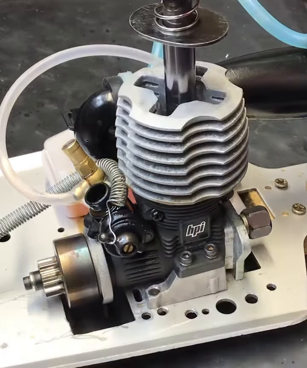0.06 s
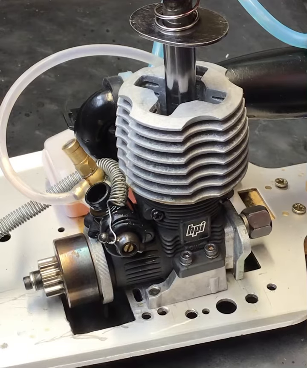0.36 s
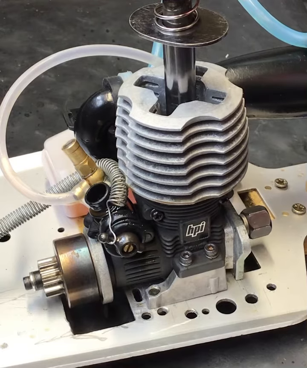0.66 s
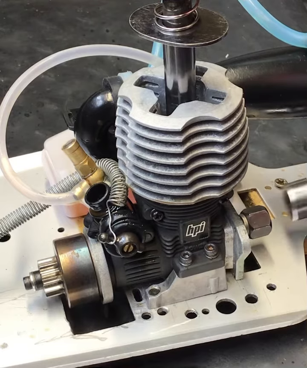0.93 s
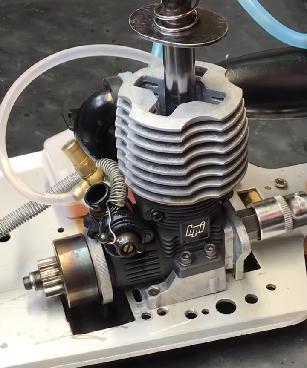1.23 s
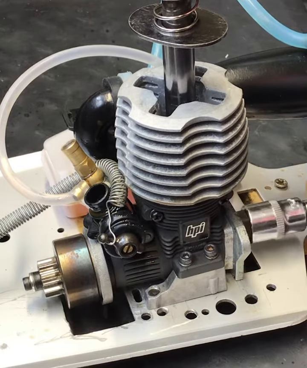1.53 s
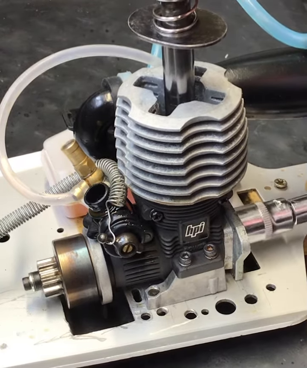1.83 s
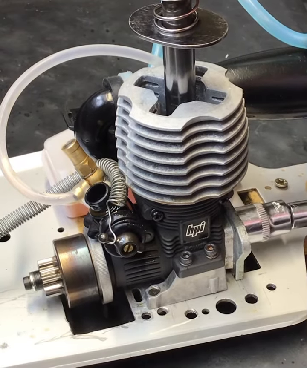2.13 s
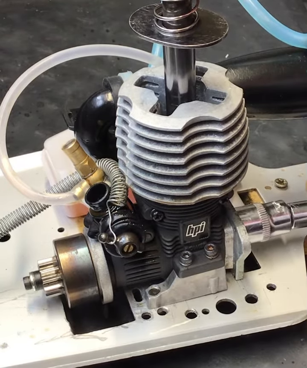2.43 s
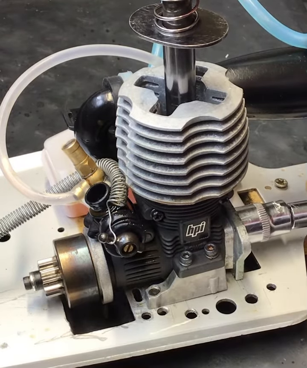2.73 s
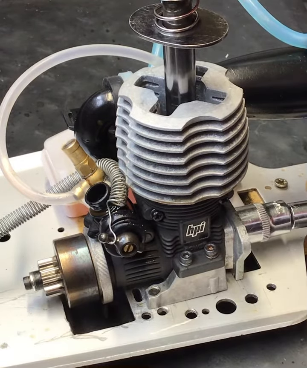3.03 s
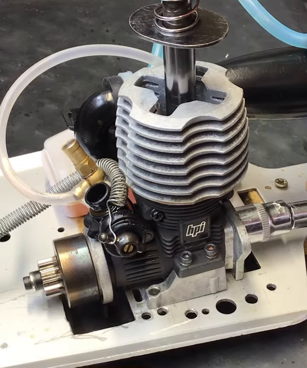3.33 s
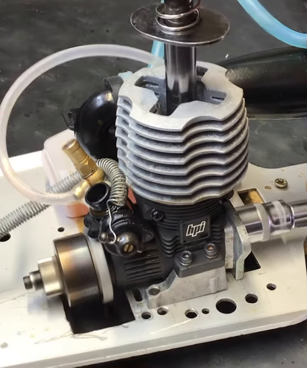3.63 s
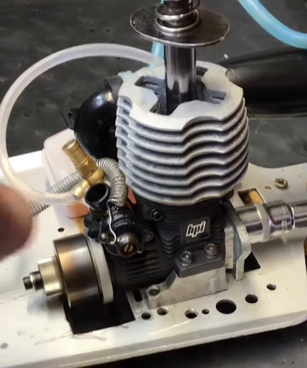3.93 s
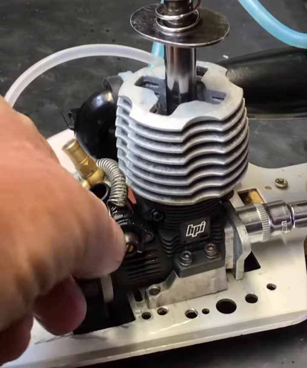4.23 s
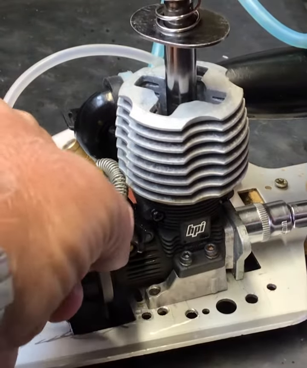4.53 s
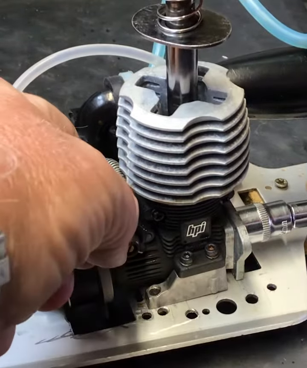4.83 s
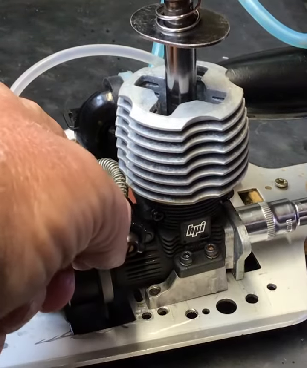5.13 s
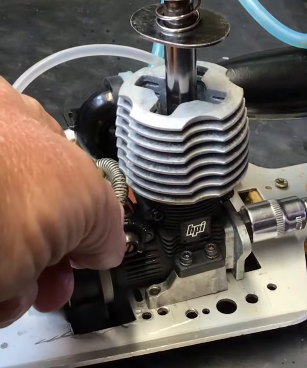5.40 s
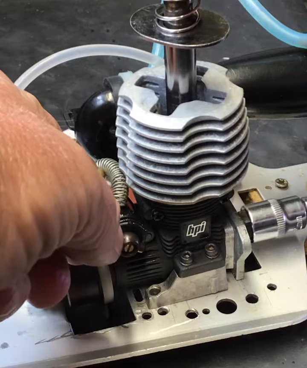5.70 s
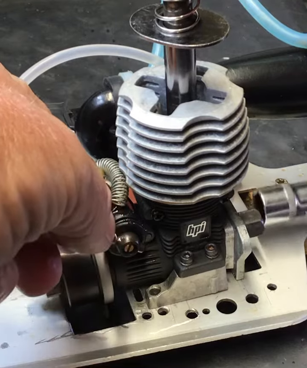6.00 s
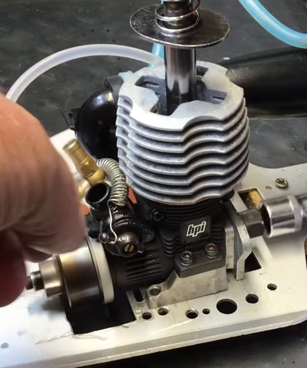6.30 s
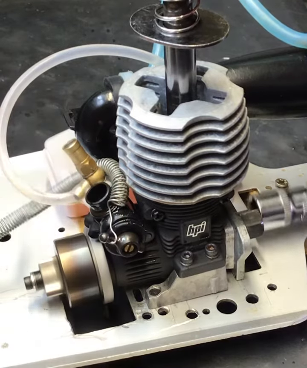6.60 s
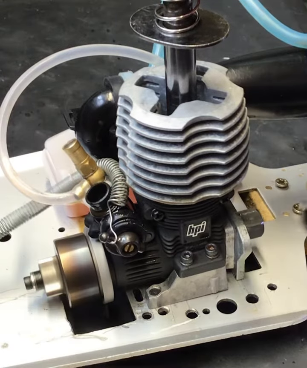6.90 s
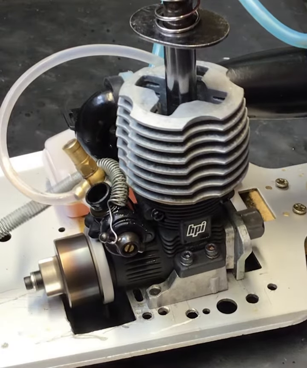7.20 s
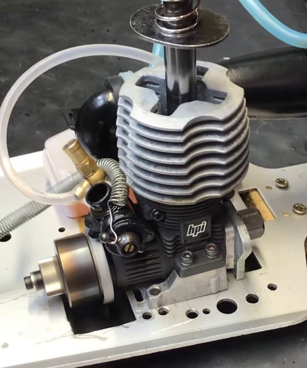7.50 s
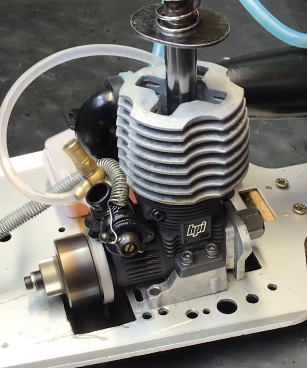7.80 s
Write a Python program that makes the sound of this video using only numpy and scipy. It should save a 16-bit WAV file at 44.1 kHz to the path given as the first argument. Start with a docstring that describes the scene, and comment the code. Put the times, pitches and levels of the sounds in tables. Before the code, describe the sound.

A metal socket clinks onto a nut, then a small model engine sputters, catches and idles with a fast, uneven, rattling buzz.

```python
"""A drill's socket scrapes and clinks onto a starter nut, and a metal chassis thuds on its bench.
The drill spins the crank; a small two-stroke glow engine sputters, catches and idles fast and unevenly.
Its exhaust port opens once a turn for a buzzing note, uneven firings pop in the pipe, and piston,
rod and gears rattle the casing. The drill is drawn off and the engine runs on alone.
All of it is heard close up, in mono, over a faint workshop rumble."""
import sys
import numpy as np
from scipy import signal
from scipy.fft import rfft, irfft
from scipy.io import wavfile
from scipy.ndimage import map_coordinates

SR = 44100
rng = np.random.default_rng(int(sys.argv[2]) if len(sys.argv) > 2 else 0)


def inscribe(sig):
    """Save sig as 16-bit PCM at rate SR to the path in sys.argv[1].

    A 1-D sig is mono; a 2-D sig holds one channel per row.
    Samples are clipped to [-1, 1] before scaling.
    """
    pcm = np.round(np.clip(np.atleast_2d(sig).T, -1, 1) * 32767)
    wavfile.write(sys.argv[1], SR, pcm.astype(np.int16))


N = 350595
TIME = np.arange(N) / SR

# Metal knocks, then two sharp cracks as the engine sputters and catches. Each row: start in seconds, strength
# in dB, weight in dB (lifts the hit's low clunk), hardness in dB.
HITS = [(0.2627, -35, 0, -13), (0.2824, -45, 7, -14), (0.2994, -57, 14, -10), (0.381, -55, 17, -15),
        (0.419, -60, 4, -11), (0.456, -60, 6, -16), (1.032, -65, 10, 7), (1.067, -68, 1, 8),
        (1.101, -45, 6, 4), (1.133, -63, 12, 0), (1.358, -54, 3, 8), (1.464, -65, 0, 14),
        (1.4764, -62, 24, 9), (1.491, -56, 18, -1), (1.5536, -58, 11, -4), (1.642, -30.5, -4.5, 13),
        (1.664, -52, 17, 9), (1.698, -57, 14, 0), (1.748, -59, 12, 1), (1.925, -48.5, -4, -3),
        (3.31, -45, 1, -5), (3.3699, -29, 0, 2), (3.416, -19, 3, 15), (3.643, -31, 0, 6), (3.75, -31, 2, 6)]


def from_db(db):
    """Decibels to gain."""
    return 10 ** (np.asarray(db) / 20)


def rms_one(x):
    """Scale to unit rms."""
    return x / np.sqrt(np.mean(x ** 2) + 1e-20)


def in_time(curve):
    """Read a curve of (seconds, value) rows at every sample."""
    return np.interp(TIME, *np.transpose(curve))


def at_hz(spectrum, hz):
    """Read a spectrum of (Hz, dB) rows on a log-frequency axis."""
    points_hz, points_db = np.transpose(spectrum)
    return np.interp(np.log(hz), np.log(points_hz), points_db)


def drift(rate_hz):
    """Smooth random wander of unit rms."""
    knots = rng.standard_normal(int(TIME[-1] * rate_hz) + 2)
    fine = signal.resample_poly(knots, 10, 1)
    return rms_one(np.interp(TIME * rate_hz * 10, np.arange(len(fine)), fine))


def per_turn(turns):
    """One random value for each turn of the crank, gliding to the next."""
    count = int(turns[-1]) + 2
    return np.interp(turns, np.arange(count), rng.standard_normal(count))


def band(x, low_hz, high_hz):
    """Butterworth band-pass."""
    sos = signal.butter(2, [low_hz, min(high_hz, .45 * SR)], "band", fs=SR, output="sos")
    return signal.sosfilt(sos, x + 1e-18)


def colour(x, spectrum, modes=(), size=8192):
    """An EQ of unit power gain: a broad spectrum with resonant peaks and dips on it."""
    hz = np.maximum(np.fft.rfftfreq(size, 1 / SR), 1)
    db = at_hz(spectrum, hz)
    for centre, width, lift in modes:
        db += lift / (1 + (2 * (hz - centre) / width) ** 2)
    cepstrum = irfft(np.log(from_db(db)))[:size // 2]
    response = irfft(np.exp(2 * rfft(cepstrum, size)))   # minimum phase: nothing sounds early
    return signal.oaconvolve(x, response / np.linalg.norm(response))[:N]


def sliding(rise_s=.012):
    """Envelope of the socket sliding on the nut: each slide starts quickly and dies away."""
    # Slides of the socket. Each row: start in seconds, level in dB, t60 in seconds.
    slides = [(0, -68, .9), (.27, -73, 1.2), (1.11, -56, .25), (1.2, -70, 1.5), (1.43, -60, .6),
              (1.615, -50, .55), (2.005, -60, .5), (2.03, -71, 8), (2.99, -75, .4)]
    envelope = np.zeros(N)
    for start, db, t60 in slides:
        age = np.maximum(TIME - start, 0)
        envelope += from_db(db - 60 * age / t60) * (1 - np.exp(-age / rise_s))
    return envelope


def rubbing(stick_slip_db=3):
    """Steel catches and slides on steel as the socket is worked into place; a faint whistle passes."""
    # A faint, narrow whistle swells and fades, like a breath drawn in.
    # In order: start and length in seconds, pitch and width in Hz, level in dB.
    faint_whistle = (2.05, .75, 1810, 110, -81.5)
    # Tone of the scrape. Each row: frequency in Hz, relative level in dB.
    scrape_spectrum = [(250, 4), (700, 6.5), (1200, -5.5), (1800, -6.5), (2600, -8), (4500, -20.5),
                       (9000, -23.5), (15000, -30)]
    start, length, hz, width, db = faint_whistle
    slips = rms_one(from_db(stick_slip_db * drift(76)) * rng.standard_normal(N))
    swell = np.sin(np.pi * np.clip((TIME - start) / length, 0, 1))
    whistle = rms_one(band(slips, hz - width / 2, hz + width / 2))
    return sliding() * colour(slips, scrape_spectrum) + from_db(db) * swell * whistle


def workshop(air_db=-75, rumble_db=-63, handling_db=1):
    """A low rumble, stronger while the socket slides, under steady, faint air noise."""
    # Workshop room tone. Each row: frequency in Hz, relative noise density in dB.
    room_spectrum = [(15, -58), (25, -27), (69, -0.5), (142, -22), (363, -21), (978, -46.5), (2300, -40.5),
                     (3260, -45.5), (3540, -42), (15000, -54.5)]
    tone = colour(rng.standard_normal(N), room_spectrum)
    rumble = (from_db(rumble_db) + from_db(handling_db) * sliding()) * rms_one(band(tone, 25, 160))
    return rumble + from_db(air_db) * rms_one(band(tone, 200, 16000))


def blows(levels_db, band_hz, crack_t60, tail_db, tail_t60, ring_db, rise_s=.0015, detune=.0092):
    """One register of the hits: a crack, a short room tail, and modes that shift from hit to hit."""
    # Ring of the steel. Each row: frequency in Hz, relative level in dB, t60 in seconds.
    steel_modes = [(293, -2.5, .2), (482, -13.5, .1), (567, 1, 0.099), (655, -1.5, 0.084), (767, -7, .09),
                   (1912, 3, 0.059), (2010, -9, 0.041), (2340, 7.5, 0.035), (2480, -2.5, .05),
                   (2635, 1, 0.073), (3370, -4, 0.038), (4740, -5, 0.066), (6660, -11.5, 0.085),
                   (8870, 1.5, 0.033), (10000, -8, 0.065)]
    low_hz, high_hz = band_hz
    out, t = np.zeros(N), TIME[:SR // 4]
    for (start, *_), db in zip(HITS, levels_db):
        decay = from_db(-60 * t / crack_t60) + from_db(tail_db - 60 * t / tail_t60)
        burst = decay * rng.standard_normal(len(t))
        hit = band(burst, low_hz, high_hz) * np.sqrt(SR / 2 / (high_hz - low_hz))
        for hz, mode_db, t60 in steel_modes:
            if low_hz < hz < high_hz:
                swing = rng.choice([-1, 1]) * np.sin(2 * np.pi * hz * (1 + detune * rng.normal()) * t)
                hit += from_db(ring_db + mode_db + rng.normal(0, 2.3) - 60 * t / t60) * swing
        at = round(start * SR)
        out[at:at + len(t)] += from_db(db) * hit * (1 - np.exp(-t / rise_s))
    return out


def knocks_and_cracks():
    """Metal knocks, then two cracks of the catching engine: hard hits are bright, heavy ones clunk."""
    _, db, weight_db, hard_db = np.transpose(HITS)
    clunk_db, clank_db = db - 1.5 + weight_db, db + 1 - .17 * hard_db
    clack_db, edge_db = db - 1, db + 1.5 + hard_db
    clunk = blows(clunk_db, (230, 775), crack_t60=.044, tail_db=-16, tail_t60=.31, ring_db=-.5)
    clank = blows(clank_db, (1600, 2400), crack_t60=.034, tail_db=-23, tail_t60=.23, ring_db=-6.5)
    clack = blows(clack_db, (2450, 5500), crack_t60=.027, tail_db=-19.5, tail_t60=.2, ring_db=-3)
    edge = blows(edge_db, (5800, 12000), crack_t60=.012, tail_db=-24.5, tail_t60=.16, ring_db=-11.5)
    return clunk + clank + clack + edge


def thuds(t60=.16, rise_s=.0073, rumble_share=.3):
    """The chassis rocks on the bench top: a low swing that swells and dies."""
    # Rocks of the chassis. Each row: start in seconds, relative level in dB, pitch in Hz.
    rocks = [(0.279, -31, 75.4), (0.388, -39, 91.5), (0.614, -34.5, 93), (0.649, -43, 105),
             (0.795, -47, 80), (1.124, -32, 104), (1.169, -36, 114), (1.378, -32.5, 80),
             (1.493, -27.5, 103), (1.534, -31, 105), (1.666, -21.5, 91.5), (1.699, -26.5, 95),
             (1.773, -33, 110), (1.933, -40.5, 89), (3.403, -15.5, 109), (3.445, -8, 107)]
    out, t = np.zeros(N), TIME[:SR // 2]
    for start, db, hz in rocks:
        rumble = rms_one(band(rng.standard_normal(len(t)), 40, 164))
        envelope = from_db(db + 2.5 - 60 * t / t60) * (1 - np.exp(-t / rise_s))
        at = round(start * SR)
        out[at:at + len(t)] += envelope * (np.sin(2 * np.pi * hz * t) + rumble_share * rumble)
    return out


def chatter(turns, repeat_share, throb=.16, uneven_db=1.32, ticks_per_s=350, tick_share=.39, slop=.014):
    """Piston, rod and gears: contacts that recur each turn, random grinding and loose ticks."""
    one_turn = rng.standard_normal(200)
    position = (turns + slop * per_turn(turns)) % 1 * len(one_turn)
    recurring = map_coordinates(one_turn, [position], order=3, mode="grid-wrap") * (turns > 0)
    ticks = rms_one((rng.random(N) < ticks_per_s / SR) * rng.standard_normal(N))
    stroke = (1 + throb * np.cos(2 * np.pi * turns)) * from_db(uneven_db * per_turn(turns))
    grinding = rng.standard_normal(N)
    return rms_one(stroke * (grinding + tick_share * ticks + repeat_share * recurring))


def rattle(turns, blend, rattle_db, hiss_db, split_hz=9700):
    """The chatter shakes the casing, with a hiss on top; its ring blends between two colours."""
    # Broad tone of the rattle. Each row: frequency in Hz, relative noise density in dB.
    casing_spectrum = [(500, -13), (1050, -3), (1400, -8), (2000, -7), (2700, -5), (3400, -1), (4200, -6.5),
                       (5100, -2), (5700, -9.5), (6500, -6.5), (7500, -11.5), (8900, -6.5), (10200, -17),
                       (15800, -16.5)]
    # The casing's early and free-running ring colours. Each row: centre in Hz, width in Hz, lift in dB.
    early_modes = [(1850, 220, 7.5), (2465, 160, 7.5), (2990, 120, 9), (3140, 110, -15), (3860, 120, 6),
                   (4450, 70, 4), (5030, 62, 1), (5310, 140, 3), (6140, 160, 9.5), (6760, 260, 9),
                   (8700, 700, 4), (11300, 440, 2.5), (12100, 400, 3), (14200, 300, 7), (15300, 250, 4)]
    free_modes = [(1100, 22.5, 3.9), (1888, 97, 7.5), (2389, 180, 2.5), (3000, 167, 6.1), (3750, 180, 3.28),
                  (4540, 290, 9), (6200, 311, 2.5), (6720, 180, 2.7), (8855, 660, 3), (9400, 130.5, 3),
                  (11200, 310, 7.1), (13000, 180, 3), (14600, 350, 4)]
    drive = chatter(turns, repeat_share=.37)
    early, free = colour(drive, casing_spectrum, early_modes), colour(drive, casing_spectrum, free_modes)
    casing = blend * early + (1 - blend) * free
    body = signal.sosfiltfilt(signal.butter(3, split_hz, fs=SR, output="sos"), casing)
    return from_db(rattle_db + 1.98) * body + from_db(hiss_db + 6.5) * (casing - body)


def bench_echoes(x, echo_db=-11, t60=.078, count=40):
    """Bench top, tools and walls return a spray of early reflections that ripples the spectrum."""
    delays_s = rng.uniform(.002, .05, count)
    response = np.zeros(SR // 16)
    response[(delays_s * SR).astype(int)] = rng.choice([-1, 1], count) * from_db(-60 * delays_s / t60)
    response *= from_db(echo_db) / np.linalg.norm(response)
    response[0] = 1   # the direct sound
    return signal.oaconvolve(x, response / np.linalg.norm(response))[:N]


def sputter(turns, speed, skip, gas_share=.97, puff_turns=.66):
    """Strong and weak firings, often alternating, pop into the pipe, each with a puff of turbulent gas."""
    # Tone of the exhaust pipe and silencer. Each row: frequency in Hz, relative level in dB.
    pipe_spectrum = [(30, -62), (55, -7.5), (90, -2.5), (140, 1.5), (220, 0), (290, 1), (370, 5), (450, -3),
                     (560, 5.5), (700, 5), (830, -12), (1000, -19), (1200, -9), (1450, -31)]
    # Silencer chambers, which pick up the half-speed beat. Each row: centre and width in Hz, lift in dB.
    chambers = [(88.5, 16, 5), (106, 19, -6), (290.5, 18, 5), (234, 47, -2)]
    firings = np.flatnonzero(np.diff(np.floor(turns)) > 0)
    alternation = (-1.) ** np.arange(len(firings)) * np.tanh(3 * drift(5)[firings])
    strength = .64 * rng.standard_normal(len(firings)) + .67 * skip[firings] * alternation
    pops = np.zeros(N)
    pops[firings] = strength * np.sqrt(SR / speed[firings])   # equal power at any speed
    puffs = rms_one(np.exp(-(turns % 1) / puff_turns) * rng.standard_normal(N))
    return colour(pops + gas_share * puffs, pipe_spectrum, chambers)


def harmonic_levels(speed, wander_db=1.5):
    """Exhaust levels in dB: boom and bark ride curves; the pipe favours or swallows the rest by speed."""
    # The fundamental's boom, the second harmonic's bark. Each row: time in seconds, relative level in dB.
    boom = [(3.45, -25), (3.55, -27), (3.59, -34), (3.69, -18), (4.13, -22), (4.16, -28), (4.3, -20),
            (4.35, -25), (4.75, -18), (4.92, -31), (5.1, -23), (5.3, -23), (5.33, -28), (5.44, -22),
            (6.03, -17), (6.39, -20), (7.41, -17), (7.45, -20), (7.66, -17), (7.75, -23), (7.95, -21)]
    bark = [(3.45, -25), (3.52, -19), (3.65, -21), (3.71, -28), (4.29, -33), (4.55, -23), (4.8, -27),
            (4.88, -22), (5.91, -24), (6.03, -29), (6.08, -23), (6.14, -30), (6.22, -24), (6.43, -26),
            (6.93, -24), (7.35, -31), (7.47, -26), (7.56, -32), (7.67, -28), (7.95, -26)]
    # Pipe resonances that harmonics 3 and 4 glide through. Each row: frequency in Hz, relative level in dB.
    pipe_response = [(370, -27), (420, -22.5), (492, -42), (520, -26.5), (545, -28), (565, -32),
                     (595, -31.5), (660, -28.5), (725, -29.5), (800, -35)]
    third, upper = [at_hz(pipe_response, k * speed) + wander_db * drift(9) for k in (3, 4)]
    return in_time(boom) + .6, in_time(bark) + 1.6, third, upper - 3


def exhaust_note(turns, speed, rough=.061, upper_rough=.35, jitter_turns=.004):
    """The port opens once a turn; uneven burning roughens the higher harmonics most."""
    # Upper exhaust harmonics. Each row: multiple of the crank speed, relative level in dB.
    overtones = [(4, 7.5), (5, -10.5), (6, -11.5), (7, -12.5)]
    boom_db, bark_db, third_db, upper_db = harmonic_levels(speed)
    angle = 2 * np.pi * (turns + jitter_turns * per_turn(turns))
    note = from_db(boom_db - .5) * np.cos(angle) * (1 + rough * per_turn(turns))
    note += from_db(bark_db - 2.5) * np.cos(2 * angle) * (1 + 2 * rough * per_turn(turns))
    for multiple, db in [(3, third_db)] + [(k, upper_db + lift) for k, lift in overtones]:
        note += from_db(db - 4.5) * np.cos(multiple * angle) * (1 + upper_rough * per_turn(turns))
    return -np.sqrt(2) * note   # the harmonics line up in a sharp trough


def singing(turns, speed, blend, capture_hz=28, flicker=.3, fade_in_s=(3.65, 3.85)):
    """Strong modes stand out of the rattle; a crank harmonic that meets one draws a tone from it."""
    # Singing metal. Each row: centre and width in Hz, level in dB in the early ring colour,
    # level in dB in the free-running one, level of the tone against the ring in dB.
    metal_modes = [(1200, 50, -46, -48, 6), (2985, 110, -45.5, -45, 0), (3440, 295, -36, -36.5, -9),
                   (4635, 114, -43.5, -39, 0), (5040, 160, -41.5, -42, -4), (8750, 498, -40, -40, -7)]
    # Now and then a mode swells. Each row: middle and half length in seconds, mode in Hz, lift in dB.
    swells = [(3.86, .1, 4635, 4), (4.0, .06, 3440, 6), (4.15, .17, 8750, 6), (4.29, .17, 1200, 7),
              (4.55, .4, 5040, 5), (4.93, .1, 1200, 7), (5.1, .4, 8750, 3), (5.85, .55, 3440, 5),
              (6.41, .07, 4635, 8), (7.55, .45, 3440, 3.5), (7.9, .13, 4635, 6)]
    drive, out = chatter(turns, repeat_share=.8), np.zeros(N)
    for hz, width, early_db, free_db, tone_db in metal_modes:
        ring = rms_one(signal.lfilter(*signal.iirpeak(hz, hz / width, fs=SR), drive))
        multiple = np.round(hz / speed)
        meets = np.exp(-((multiple * speed - hz) / capture_hz) ** 2)
        tone = meets * np.sqrt(2) * np.sin(2 * np.pi * multiple * turns) * (1 + flicker * drift(40))
        swell_db = sum(lift * np.exp(-((TIME - middle) / half) ** 2)
                       for middle, half, mode_hz, lift in swells if abs(mode_hz - hz) < width)
        level_db = blend * early_db + (1 - blend) * free_db + swell_db
        out += from_db(level_db) * (ring + from_db(tone_db) * tone)
    return out * np.interp(TIME, fade_in_s, [0, 1])


def effort_db(wind_up, eases_s, steady_db, rest_loss_db, struggle_db, settle_s):
    """A layer grows as the crank winds up, is loudest while the engine struggles, then settles."""
    struggle = np.exp(-np.maximum(TIME - eases_s, 0) / settle_s)
    return steady_db - rest_loss_db * (1 - wind_up) + struggle_db * struggle


def engine(start_s=3.308, fires_s=3.45, catches_s=3.63, idle_hz=182, waver=.006):
    """The drill winds the crank up from rest; the charge fires, catches and settles into a fast idle."""
    # Crank speed once the charge fires. Each row: time in seconds, turns per second.
    speed_curve = [(3.45, 129.9), (3.5, 136.0), (3.62, 142.5), (3.7, 162.3), (3.72, 164.1), (4.08, 167.4),
                   (4.15, 175.1), (4.3, 168.2), (4.6, 182.0), (4.72, 183.4), (4.83, 197.3), (4.88, 188.8),
                   (4.93, 199.6), (5.07, 188.7), (5.45, 194.9), (5.74, 185.0), (6.08, 185.2), (6.36, 173.3),
                   (6.38, 177.8), (6.48, 175.4), (7.31, 183.2), (7.45, 175.2), (7.5, 182.4), (7.57, 186.9),
                   (7.65, 184.4), (7.75, 197.1), (7.8, 191.4), (7.95, 193.2)]
    # Blend between two ring colours of the casing, settling on the free-running one.
    # Each row: time in seconds, share of the early colour from 0 to 1.
    blend_curve = [(3.6, .8), (3.85, .3), (4.6, 1), (5.4, .95), (5.9, .6), (6.25, .05)]
    running_hz, blend = in_time(speed_curve), in_time(blend_curve)
    wind_up = np.clip((TIME - start_s) / (fires_s - start_s), 0, 1)
    speed = running_hz * wind_up * (1 + waver * drift(35))
    turns = np.cumsum(speed) / SR
    firing = np.clip((TIME - fires_s) / .026, 0, 1)
    note = firing * exhaust_note(turns, running_hz)

    sputter_db = effort_db(wind_up, catches_s, steady_db=-29.4, rest_loss_db=7, struggle_db=8.5, settle_s=.13)
    sputter_db += np.interp(TIME, [5, 6.4], [0, 3])   # the drill eases off and no longer steadies it
    skip = .6 * (TIME > catches_s)   # once caught, every other firing tends to be weak
    pops = from_db(sputter_db) * wind_up ** 2 * sputter(turns, speed, skip)

    rattle_db = effort_db(wind_up, fires_s, steady_db=-26.6, rest_loss_db=28, struggle_db=5, settle_s=.18)
    hiss_db = effort_db(wind_up, fires_s, steady_db=-31.6, rest_loss_db=40, struggle_db=9, settle_s=.5)
    flutter_db = .7 * drift(12)
    rattle_db += .06 * (running_hz - idle_hz) + flutter_db   # faster running rattles and hisses more
    hiss_db += .08 * (running_hz - idle_hz) + flutter_db
    metal = rattle(turns, blend, rattle_db, hiss_db) + singing(turns, running_hz, blend)
    return (TIME > start_s) * (note + pops + bench_echoes(metal))


def scene():
    """Everything reaches one close microphone."""
    mono = engine() + knocks_and_cracks() + rubbing() + thuds() + workshop()
    return np.array([mono, mono])


def record(dry, low_cut_hz=38, high_cut_hz=15800, ceiling=.95):
    """The microphone sheds the deep bass, peaks are rounded and the top is cut."""
    thin = signal.sosfilt(signal.butter(4, low_cut_hz, "high", fs=SR, output="sos"), dry)
    rounded = ceiling * np.tanh(thin / ceiling)
    return signal.sosfilt(signal.ellip(12, .1, 90, high_cut_hz, fs=SR, output="sos"), rounded)


dry = scene()
out = record(dry)
inscribe(out)
```